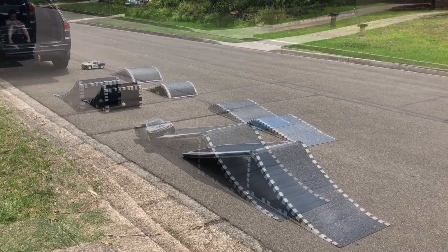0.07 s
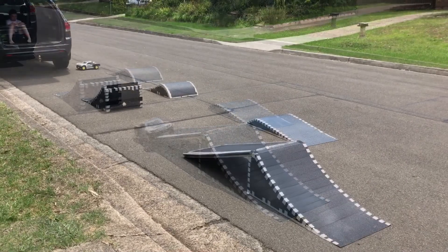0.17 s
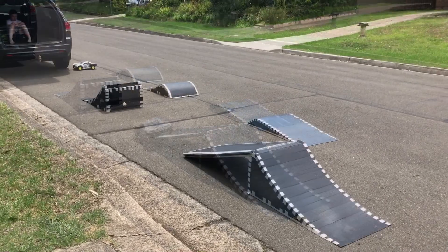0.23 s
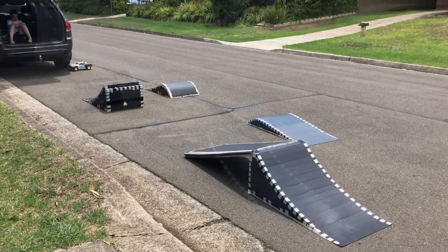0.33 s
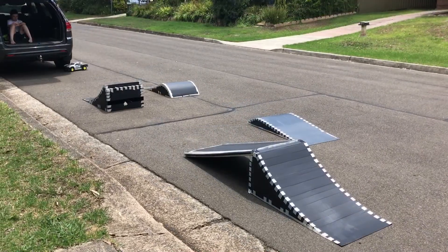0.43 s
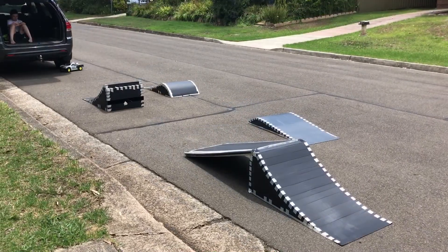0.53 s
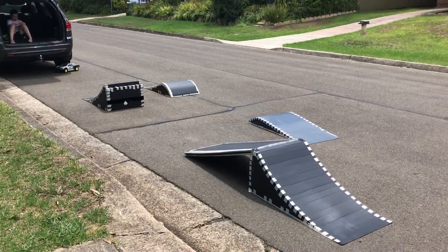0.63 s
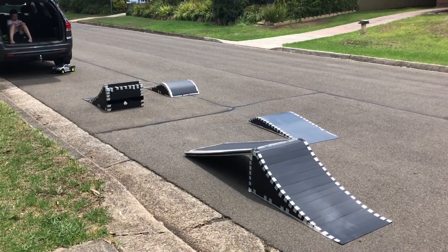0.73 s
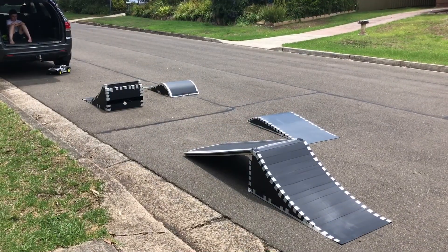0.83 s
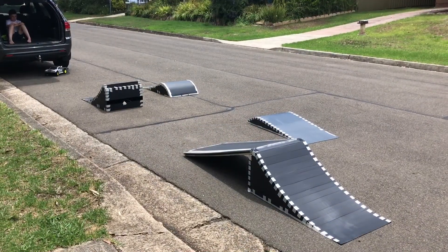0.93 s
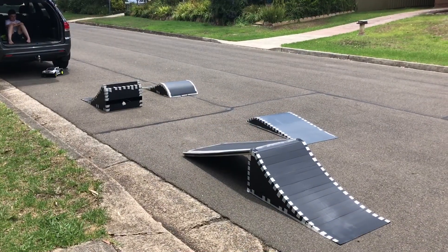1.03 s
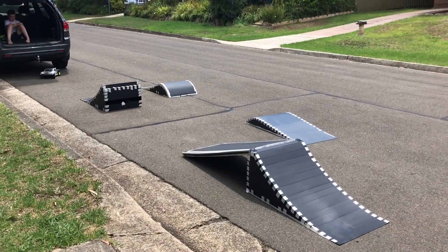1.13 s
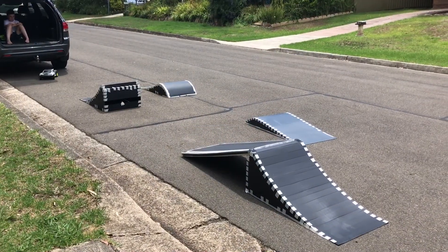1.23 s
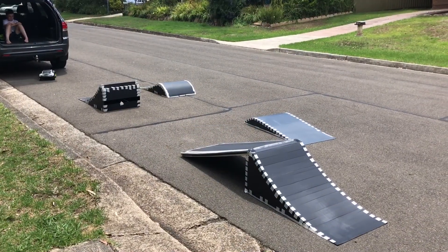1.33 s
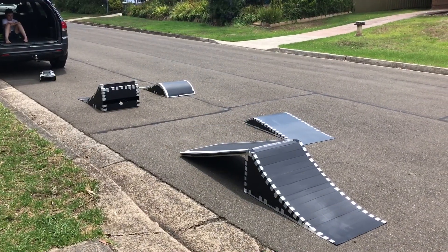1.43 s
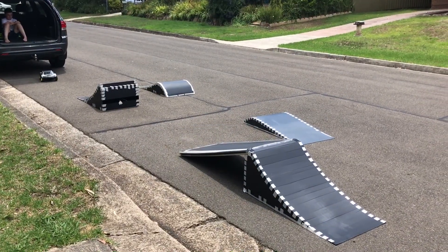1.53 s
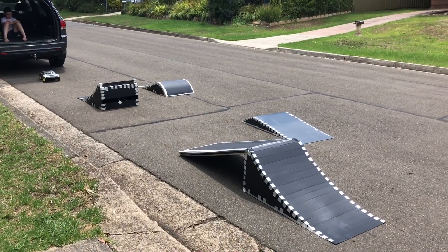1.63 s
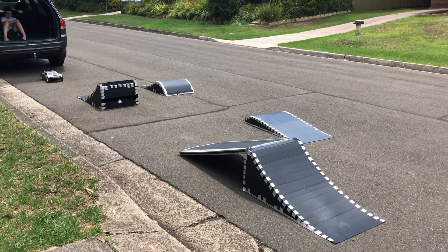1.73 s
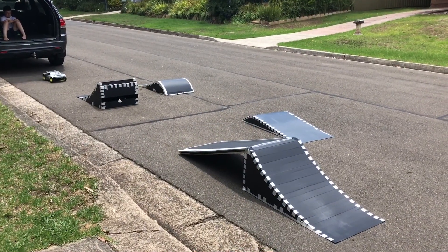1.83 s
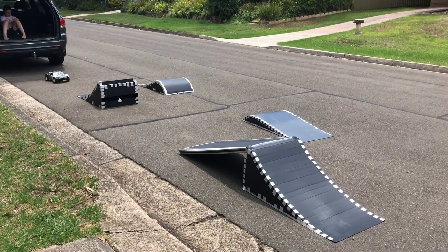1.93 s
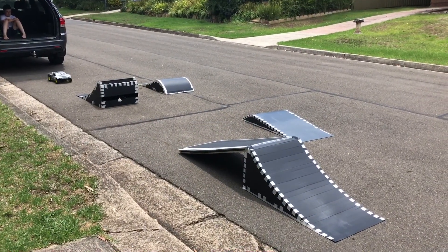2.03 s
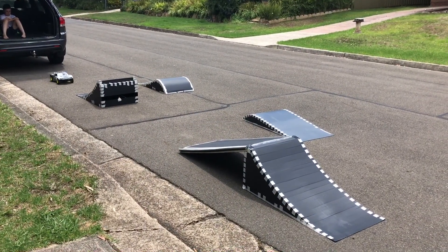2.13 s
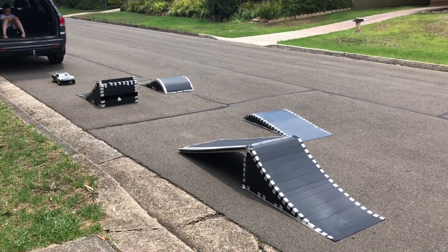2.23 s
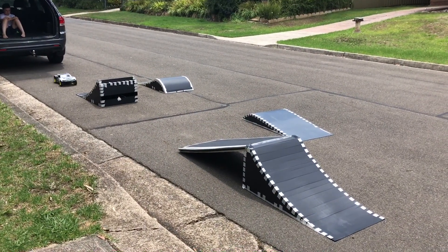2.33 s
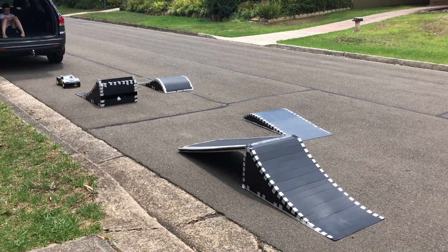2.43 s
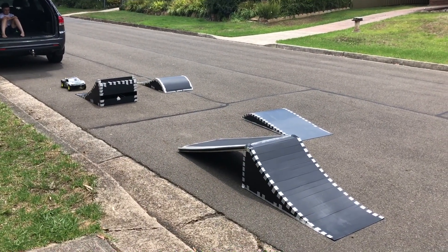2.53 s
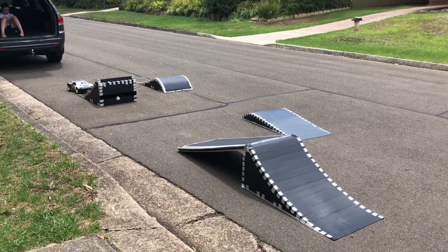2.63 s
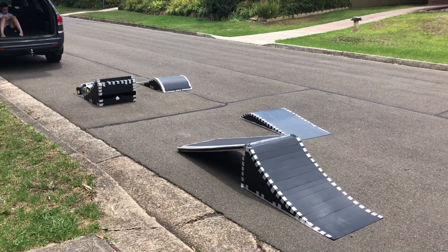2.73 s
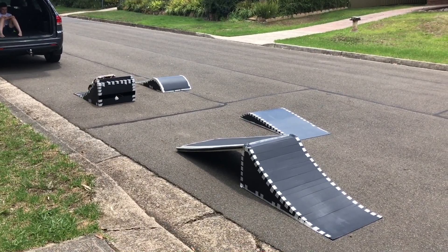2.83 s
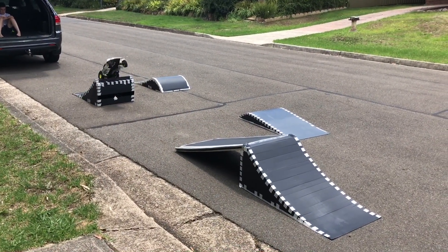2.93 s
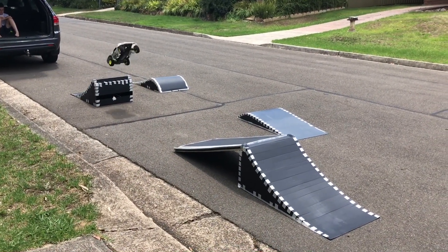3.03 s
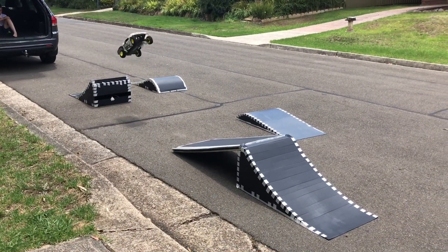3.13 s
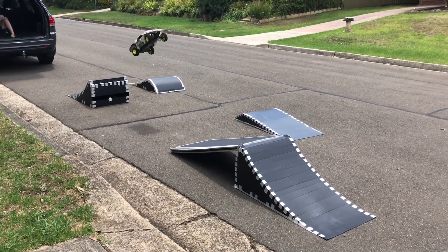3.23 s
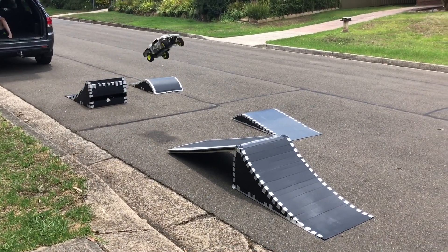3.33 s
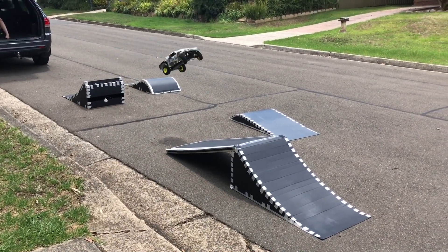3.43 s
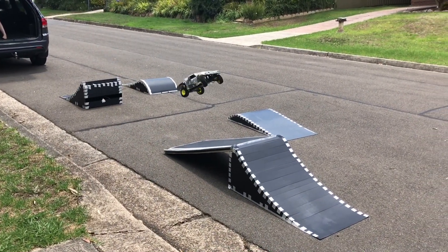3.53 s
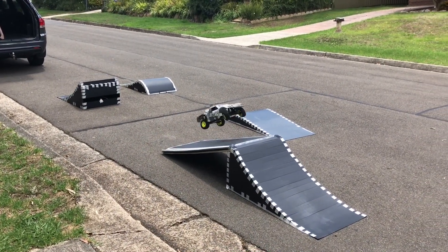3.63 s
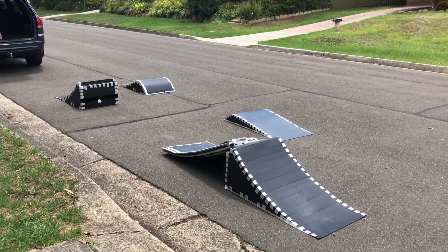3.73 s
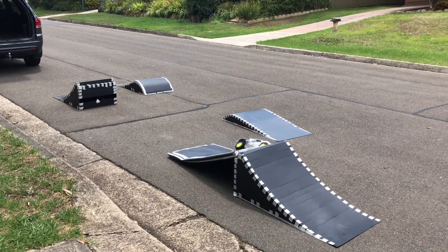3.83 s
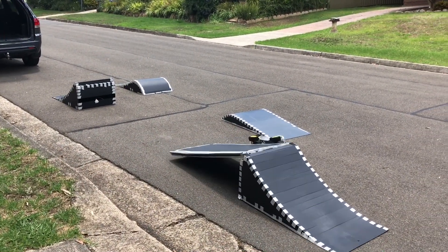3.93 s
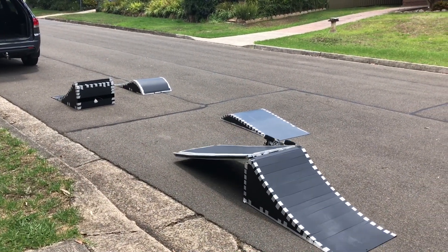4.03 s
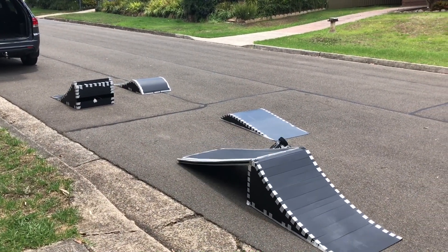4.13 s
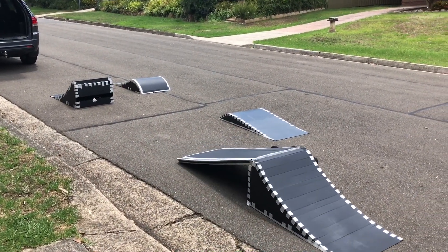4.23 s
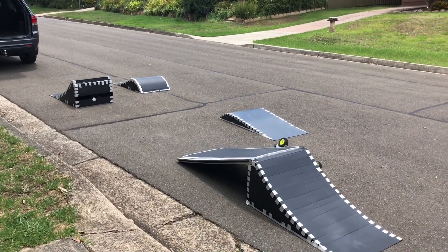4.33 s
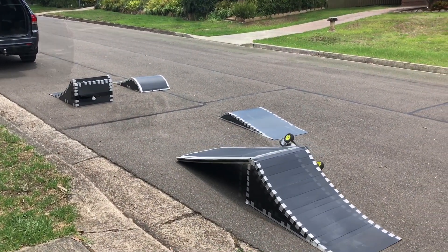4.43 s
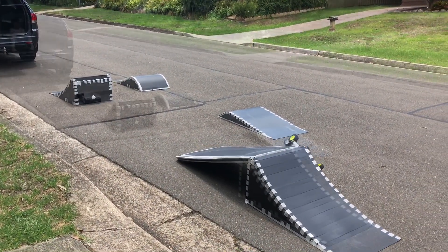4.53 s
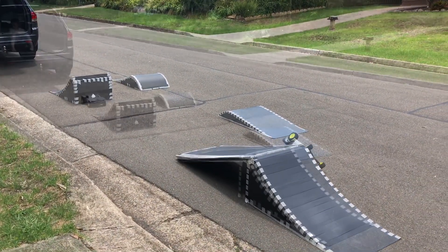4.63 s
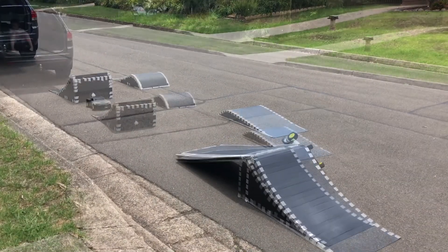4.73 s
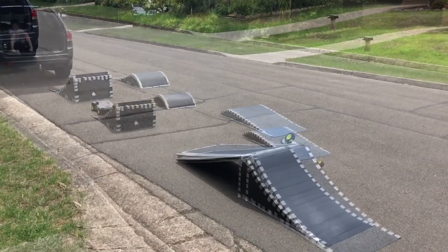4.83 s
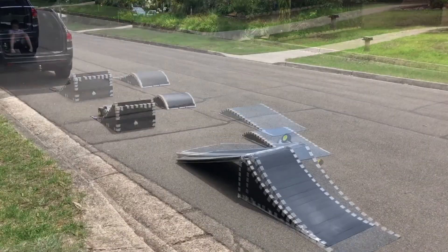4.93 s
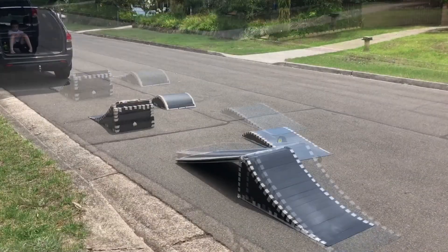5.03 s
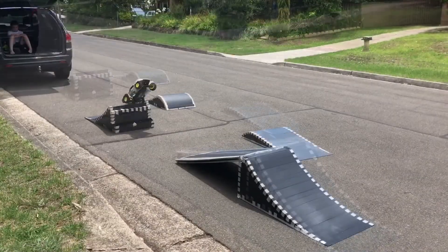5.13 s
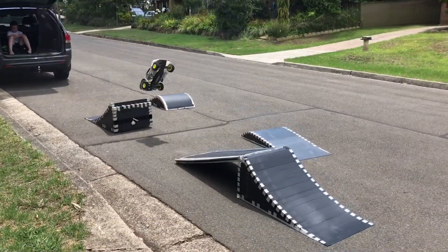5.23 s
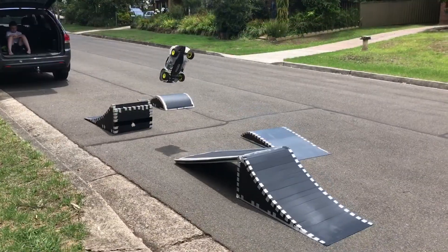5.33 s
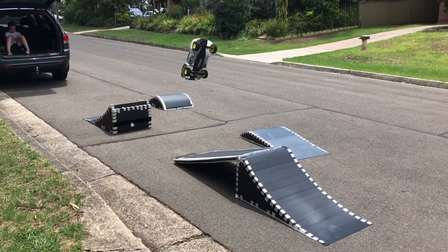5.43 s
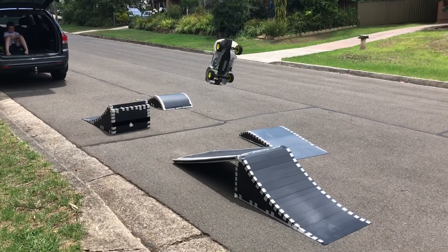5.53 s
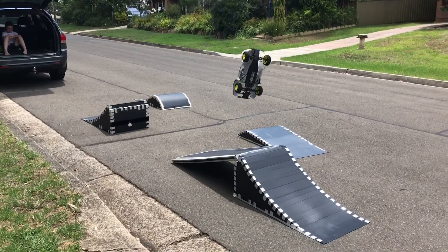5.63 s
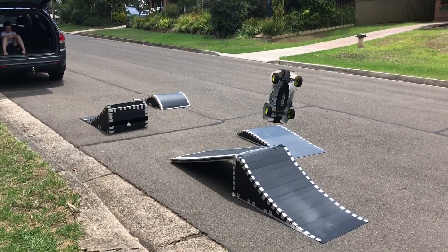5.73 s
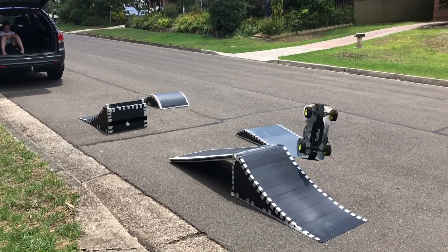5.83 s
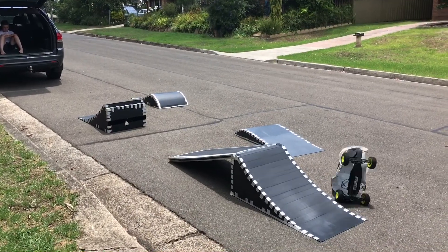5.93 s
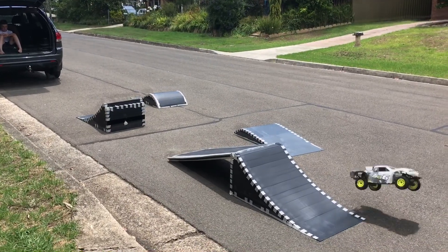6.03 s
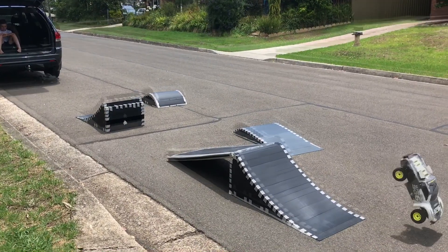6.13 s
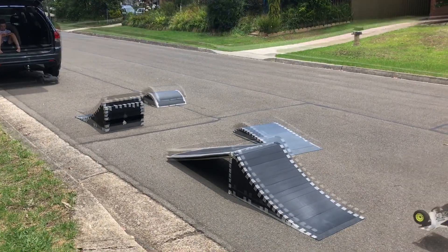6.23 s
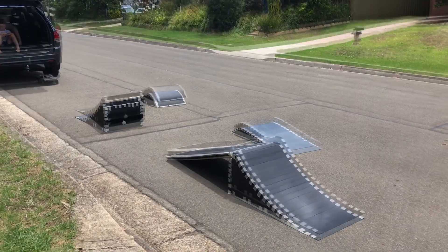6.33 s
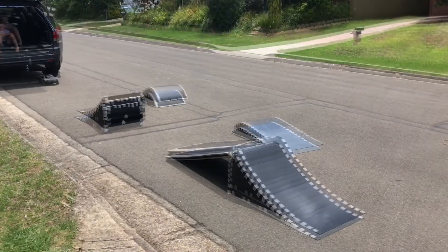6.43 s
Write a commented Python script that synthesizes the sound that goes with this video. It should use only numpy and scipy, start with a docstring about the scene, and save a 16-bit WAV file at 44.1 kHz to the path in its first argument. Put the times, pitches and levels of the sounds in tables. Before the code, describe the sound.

A quiet suburban street with faint traffic hum, thin bird whistles and insect buzzes. A small electric truck's gears whine up sharply, it jumps with a light rattle, then crashes onto hollow plastic ramps and tumbles in clattering knocks. After a brief lull it whirs again, takes off and slams much louder on the asphalt, bouncing once more. One outdoor microphone, mono, with faint street echoes.

```python
"""A small electric radio-controlled truck whines up to a ramp, jumps, crashes and tumbles on hollow plastic
ramps, jumps again and slams on the asphalt of a quiet suburban street; far traffic hums, birds whistle,
insects buzz. Random knocks ring the resonances of shell, ramp and gearbox; the gear whine is wavering sines
and narrow noise, birds are gliding sines, insects and traffic shaped noise. One microphone feeds both channels."""
import sys
import numpy as np
from scipy import signal
from scipy.io import wavfile
from scipy.ndimage import uniform_filter1d

SR = 44100
rng = np.random.default_rng(int(sys.argv[2]) if len(sys.argv) > 2 else 0)


def persist_wave(psi):
    """Save psi, clipped to +-1, as 16-bit WAV."""
    counts = np.round(np.clip(psi, -1, 1) * 32767).astype(np.int16)
    wavfile.write(sys.argv[1], SR, np.atleast_2d(counts).T)


N = 285327

# gearbox casing modes: f/Hz, width/Hz, relative level/dB
GEARBOX = [(818, 34, 10.5), (1264, 150, 2.5), (1620, 260, 2), (2083, 250, -0.5), (2730, 24, -4),
           (3086, 130, 0), (3580, 120, -34), (4360, 40, -15), (4700, 120, 0), (5240, 110, -3.5),
           (5500, 200, -3), (5980, 160, 0.5), (6250, 71, 0), (6700, 76, 2), (7360, 40, -6)]


def amp(db):
    """Decibels to gain."""
    return 10 ** (np.asarray(db) / 20)


def evened(x):
    """Scales to rms 1."""
    return x / np.sqrt(np.mean(x ** 2) + 1e-20)


def wander(s):
    """Random curve of rms 1 that changes over about s seconds."""
    span = round(s * SR)
    smooth = uniform_filter1d(rng.standard_normal(N), span)
    return evened(uniform_filter1d(smooth, span))


def grit(per_s, spread_db):
    """Random knocks of random sign and uneven size, rms 1."""
    size_db = spread_db * np.minimum(rng.exponential(1, N), 4)
    size = amp(size_db) * rng.choice([-1., 1.], N)
    return evened(size * (rng.random(N) < per_s / SR))


def read(points, hz):
    """Reads a spectrum on a log-frequency axis."""
    f, value = np.transpose(points)
    return np.interp(np.log(hz + 1), np.log(f + 1), value)


def resonate(x, hz, width):
    """Resonance of gain 1: shifts the curve hz down to zero, smooths, shifts back."""
    turn = np.exp(2j * np.pi * np.cumsum(hz * np.ones(len(x))) / SR)
    r = np.exp(-np.pi * width / SR)
    smooth = signal.lfilter([1 - r], [1, -r], x / turn)
    return 2 * (turn * smooth).real


def ringing(modes):
    """Click response of a body, energy 1: width sets the decay, a small body radiates no deep bass."""
    t = np.arange(4096) / SR
    ring = np.zeros(len(t))
    for hz, width, db in modes:
        ring += amp(db) * width * np.exp(-np.pi * width * t) * np.sin(2 * np.pi * hz * t)
    ring = signal.lfilter(*signal.butter(2, 1.33 * modes[0][0], "high", fs=SR), ring)
    return ring / np.linalg.norm(ring)


def causal(points):
    """Causal (minimum-phase) click with the given spectrum, energy 1."""
    hz = abs(np.fft.fftfreq(4096, 1 / SR))
    log_gain = np.log(amp(np.maximum(read(points, hz), -80)))
    click = np.fft.ifft(np.exp(np.conj(signal.hilbert(log_gain)))).real[:1024]
    return click / np.linalg.norm(click)


def levels(tables, column):
    """Gain over time from one column of curve tables, silent between them."""
    t, out = np.arange(N) / SR, np.zeros(N)
    for rows in tables:
        s, db = np.array(rows)[:, 0], np.array(rows)[:, column]
        fade = np.clip(np.minimum(t - s[0], s[-1] + 0.048 - t) / 0.012, 0, 1)
        out += amp(np.interp(t, s, db)) * fade
    return out


def swells(rows, scrape):
    """Scraping clicks ring one resonance, fixed or gliding, for a short swell."""
    out = np.zeros(N)
    for s, length, *ends_hz, width, db in rows:
        at, size = round(s * SR), round(length * SR)
        hz = np.linspace(ends_hz[0], ends_hz[-1], size)
        buzz = resonate(resonate(scrape[at:at + size], hz, width), hz, width)
        out[at:at + size] += amp(db) * evened(buzz) * np.sqrt(2 * np.hanning(size))
    return out


def echoes(x, t60_s):
    """Kerbs, ramps and house fronts return sparse, dull, dying taps."""
    taps = np.zeros(SR // 2)
    at = np.arange(400, len(taps) - 20, 20) + rng.integers(0, 20, (len(taps) - 401) // 20)
    taps[at] = rng.choice([-1., 1.], len(at)) * amp(-60 * at / SR / t60_s)
    taps = signal.lfilter([1], [1, -.6], taps)
    return signal.fftconvolve(x, taps / np.linalg.norm(taps))[:N]


def street():
    """Far traffic and leaves: random short-time spectra with drifting patches, plus a low drone and a hum."""
    # noise bed: f/Hz, relative density/dB per Hz
    bed_spectrum = [(15, -34), (25, 4), (70, 12.5), (114, -11.5), (185, 1), (439, -14), (988, -12.5),
                    (1520, -14.5), (2000, -20), (2760, -20), (4870, -25.5), (8590, -22.5), (10700, -32),
                    (12200, -32), (16000, -42)]
    # t/s, broad noise bed level/dB, its extra weight around 800 Hz/dB, low drone level/dB
    bed_levels = [(0, -50.5, -1.5, -53), (.4, -49, 3.5, -65), (.9, -48.5, 4, -48.5), (1.3, -50, 5, -42.5),
                  (1.9, -47.5, 8, -54.5), (2.5, -50.5, 4.5, -45), (3.6, -57.5, 14.5, -50.5),
                  (4.8, -45.5, -2.5, -55), (5.6, -47.5, -0.5, -43), (6.0, -49.5, 3.5, -43.5),
                  (6.47, -56.5, 13.5, -54)]
    # low drone: f/Hz, width/Hz, relative level/dB
    drone_modes = [(67, 21, -7.5), (111.3, 7.8, -13), (168.5, 7.3, -18)]
    # low hum that swells once: t/s, length/s, f/Hz, width/Hz, level/dB
    hum = [(5.2, 0.95, 186.2, 6.3, -59)]
    frames, hz = N // 256 + 5, np.fft.rfftfreq(1024, 1 / SR)
    a, b, patches = rng.standard_normal((frames, 513, 3)).T
    patches = evened(uniform_filter1d(uniform_filter1d(patches, 10, 0), 14, 1))
    s, level_db, mid_db, drone_db = np.transpose(bed_levels)
    mid_shape = np.exp(-(np.log((hz + 1) / 800) / 0.59) ** 2)
    mid = mid_shape[:, None] * np.interp(np.arange(frames) * 256 / SR, s, mid_db)
    spectra = (a + 1j * b) * amp(read(bed_spectrum, hz)[:, None] + 1.14 * patches + mid)
    bed = evened(signal.istft(spectra, nperseg=1024, noverlap=768)[1][:N])
    throb = rng.standard_normal(N)
    drone = sum(amp(db) * evened(resonate(resonate(throb, f, w), f, w)) for f, w, db in drone_modes)
    t = np.arange(N) / SR
    bed *= amp(np.interp(t, s, level_db))
    drone *= amp(np.interp(t, s, drone_db))
    return bed + drone + swells(hum, throb)


def insects():
    """High, broad buzzes from the verge, each bout at its own steady pace, and one fast trill."""
    # repeated buzz: first t/s, last t/s, period/s, length/s, f/Hz, width/Hz, level/dB
    bouts = [(0.2, .3, .678, .09, 10000, 2500, -65.5), (0.78, 2.3, .678, 0.051, 10400, 2800, -60),
             (0.25, 2.0, 0.767, 0.19, 7200, 3100, -61.5), (1.14, 2.45, 0.1766, 0.071, 12000, 1700, -68),
             (5.48, 6.4, .18, 0.084, 11600, 1500, -65)]
    # pulsing trill: t/s, length/s, f/Hz, width/Hz, level/dB
    trill = [(5.657, 0.39, 8700, 900, -69)]
    trill_per_s = 125
    rows = [(s, *buzz) for first, last, period, *buzz in bouts for s in np.arange(first, last, period)]
    scrape = grit(6000, 2.2)
    pulses = np.sin(np.pi * trill_per_s * np.arange(N) / SR) ** 4
    return swells(rows, scrape) + swells(trill, scrape * pulses)


def birds():
    """Short gliding, slightly unsteady whistles, some with an octave; fainter ones come from farther trees."""
    # whistles: t/s, length/s, start f/Hz, end f/Hz, level/dB
    whistles = [(.07, 0.069, 3090, 2830, -67), (0.134, 0.07, 2820, 2950, -65),
                (0.184, 0.037, 4240, 4300, -56), (0.23, 0.028, 3120, 3130, -58),
                (.246, 0.072, 2490, 2470, -67), (.33, 0.067, 2700, 2920, -60.5),
                (0.561, 0.071, 4830, 5280, -64), (0.802, 0.032, 2220, 2283, -57),
                (0.861, 0.071, 2450, 2610, -63), (1.442, 0.044, 2297, 2305, -60.5),
                (1.533, 0.077, 2475, 2920, -59.5), (1.643, 0.058, 2630, 2580, -61),
                (1.678, .04, 5170, 5500, -57), (2.054, 0.13, 4450, 4663, -66.5),
                (2.208, 0.063, 4480, 4900, -62), (4.617, 0.064, 3870, 4120, -58),
                (4.673, 0.063, 2760, 3070, -55.5), (4.799, .046, 4260, 4330, -56.5),
                (5.511, 0.11, 2580, 2820, -56), (5.57, 0.13, 5450, 5500, -58.5),
                (5.609, .036, 828, 890, -54), (5.663, 0.054, 1670, 1670, -55.5),
                (5.823, .036, 3480, 3000, -61), (5.844, 0.099, 2330, 2074, -63),
                (5.914, 0.042, 3500, 3340, -49.5), (5.959, 0.056, 2760, 2793, -53.5)]
    octave_db = -2.5
    out, draw = np.zeros(N), rng.random((40, 5))
    lowest, span = np.array([0, .05, 2300, .95, -79]), [6.3, .07, 2600, .12, 8]
    s, length, hz0, glide, db = (lowest + draw * span).T
    far = list(zip(s, length, hz0, hz0 * glide, db))
    warble = 1 + 0.0062 * wander(0.0056)
    tremble = evened(amp(2.8 * wander(0.0048)))
    for s, length, hz0, hz1, db in whistles + far:
        octave = amp(octave_db) * (2000 < hz0 < 2900)  # only whistles that start in this band, Hz
        at, u = round(s * SR), np.arange(round(length * SR)) / (length * SR)
        hz = (hz0 + (hz1 - hz0) * u) * warble[at:at + len(u)]
        turn = 2 * np.pi * np.cumsum(hz) / SR
        tone = np.sin(turn) + octave * np.sin(2 * turn)
        out[at:at + len(u)] += amp(db) * tone * np.sqrt(2 * np.sin(np.pi * u))
    return out * tremble


def gritty_tones():
    """Brief narrow, gritty ringing tones during the drive and jump: knocks ring gliding resonances."""
    # ringing tones: t/s, length/s, start f/Hz, end f/Hz, width/Hz, level/dB
    tones = [(2.39, 0.046, 2740, 2900, 119, -56), (2.96, .091, 1940, 1360, 151.2, -53),
             (3.19, 0.082, 1260, 1210, 60, -50.5), (3.34, .25, 1870, 1700, 70, -51),
             (3.4, 0.17, 4900, 4600, 200, -52.5), (3.42, 0.24, 6740, 6560, 100, -59),
             (3.6, 0.28, 4400, 3950, 160, -60), (5.0, 0.089, 4840, 4800, 120, -54),
             (5.09, .023, 840, 855, 100, -43.5), (5.07, 0.05, 4250, 4330, 100, -51),
             (5.24, 0.037, 4830, 5060, 500, -43), (5.39, 0.046, 1030, 1000, 100, -45.5)]
    return swells(tones, grit(900, 4))


def whine():
    """Gear teeth mesh at a wavering rate; worn teeth flutter and smear the tone, a second gear pair sings lower."""
    # one table a run-up, tooth mesh: t/s, f/Hz, level/dB
    run_ups = [
        [(2.41, 1190, -50), (2.474, 1704, -52), (2.508, 2260, -62), (2.522, 2800, -41), (2.546, 3174, -43.5),
         (2.7, 3154, -52), (2.774, 3153, -44), (2.86, 3140, -55), (3.012, 3180, -51), (3.055, 3600, -48),
         (3.078, 5900, -37.5), (3.134, 7320, -49), (3.24, 6900, -62)],
        [(4.66, 1648, -59), (4.826, 1869, -62), (4.885, 2300, -58), (4.905, 2740, -50), (4.925, 2800, -42),
         (4.95, 2920, -66)],
    ]
    second_db, second_db_per_khz = -81, 4  # grows with the pitch
    second_lag_s = 0.079  # the wheels' gear pair follows the motor late
    s, hz = np.vstack(run_ups)[:, :2].T
    hz = np.interp(np.arange(N) / SR, s, hz) * (1 + .011 * wander(.01))
    turn = 2 * np.pi * np.cumsum(hz * (1 + .012 * wander(.003))) / SR
    tone = np.sqrt(2) * np.sin(turn) * evened(amp(4 * wander(.006)))
    side = np.sqrt(2) * np.sin(.885 * turn) * evened(amp(5 * wander(.01)))  # one shaft turn below the mesh
    a, b, c = rng.standard_normal((3, N))
    spread = resonate(resonate(b, hz, 730), hz, 730)
    cased = evened(signal.oaconvolve(spread, ringing(GEARBOX))[:N])  # casing modes near the tone light up
    smear = evened(resonate(resonate(a, hz, 200), hz, 200))
    clean = np.clip(3400 / hz, 0, 1) ** 3  # at full revs the mesh loses its clean pitch
    lag = round(second_lag_s * SR)
    late_hz = 0.49 * uniform_filter1d(hz, round(2 * second_lag_s * SR), origin=lag - 1)
    second = evened(resonate(resonate(c, late_hz, 130), late_hz, 130))
    mesh = clean * (.9 * tone + .42 * side) + .75 * np.sqrt(clean) * smear
    mesh += (1 - clean) * evened(spread) + .5 * cased
    level = levels(run_ups, column=2)
    second_gain = (level > 0) * amp(second_db + second_db_per_khz * hz / 1e3)
    return level * mesh + second_gain * second


def jolts(column, rise_s, short=1, share=np.ones_like):
    """Gain over time of the rattle after each blow; share picks a part of its power by hardness."""
    # blows on the truck: t/s, shell level/dB, ramp boom level/dB, crack level/dB, rattle t60/s (before short)
    blows = [(0.781, -45.5, -69, -50.5, 0.19), (2.4, -45, -65, -44, 0.064), (2.978, -40, -49, -45, 0.11),
             (3.05, -48, -35, -54, 0.11), (3.072, -56, -44, -40.5, .06), (3.783, -25, -12, -24.5, 0.087),
             (3.848, -20.5, -21, -24, 0.083), (3.867, -35, -21, -25, .064), (3.885, -39, -42, -31, 0.09),
             (3.933, -33.5, -32.5, -30, 0.29), (4.082, -35, -48, -42, 0.36), (4.109, -44, -22, -36, 0.067),
             (4.119, -48, -31, -35.5, 0.079), (4.186, -28, -36, -33.5, 0.14), (4.203, -18, -45, -60, 0.089),
             (4.266, -25, -50, -32.5, 0.072), (4.363, -28.5, -45, -44.5, 0.15),
             (4.382, -23.5, -48, -47, 0.069), (4.448, -47, -38, -46.5, 0.3), (4.509, -52, -53, -46, 0.096),
             (4.58, -46, -43, -46, 0.22), (4.612, -39.5, -30, -49, 0.14), (5.031, -42, -57, -49, 0.078),
             (5.084, -32.5, -48, -42, 0.12), (5.146, -40, -47, -60, 0.067), (5.252, -31, -26, -46, .05),
             (5.298, -45, -39.5, -48, 0.19), (5.417, -58, -58, -40, .065), (5.455, -47, -40, -50, 0.07),
             (6.031, -6, -8, -13, .13), (6.044, -10, -18, -13, 0.029), (6.059, -27, -32, -13, 0.059),
             (6.088, -16, -35, -14, 0.031), (6.125, -36, -10, -18, 0.058), (6.159, -27.5, -31, -32, 0.069),
             (6.172, -26, -21, -32, 0.05), (6.233, -74, -70, -46, 0.19), (6.287, -50, -75, -53, 0.24),
             (6.345, -52, -69, -48, 0.31), (6.438, -15.5, -16, -23, 0.13), (6.455, -18.5, -45, -21.5, 0.33)]
    soft_db, hard_db = -42, -10.5  # crack minus shell level of a fully soft and a fully hard contact
    power, t = np.zeros(N), np.arange(SR // 2) / SR
    for row in blows:
        part = power[round(row[0] * SR):][:len(t)]  # a view: adds into power
        decay = amp(row[column] - 60 * t / max(short * row[4], .005))
        shape = (1 - np.exp(-t / rise_s)) * decay
        hardness = np.clip((row[3] - row[1] - soft_db) / (hard_db - soft_db), 0, 1)
        part += share(hardness) * shape[:len(part)] ** 2
    return np.sqrt(power)


def truck():
    """Rolling grit and blows shake the shell, the hollow ramp, the gearbox and the small hard parts."""
    # one table a stretch (drive, slide, drive, slide):
    # t/s, shell rattle level/dB, ramp rumble level/dB, gear and tyre hiss level/dB
    roll = [
        [(2.38, -62, -68, -64), (2.49, -49.5, -62, -52.5), (2.53, -42, -66, -47), (2.67, -42, -53, -49),
         (2.74, -49, -52.5, -50.5), (2.9, -42.5, -48.5, -53.5), (2.96, -52, -48, -58), (3.0, -46, -52, -48.5),
         (3.07, -45, -46.5, -48.5), (3.2, -49, -60, -45), (3.77, -53.5, -66, -49)],
        [(3.79, -36, -33, -41), (3.86, -26.5, -20, -33.5), (4.05, -46, -55, -45), (4.175, -49.5, -41, -47),
         (4.2, -33.5, -28, -40.5), (4.29, -38, -39.5, -48.5), (4.32, -40, -41.5, -53.5),
         (4.41, -45.5, -45.5, -59), (4.62, -42, -47, -53.5), (4.7, -58, -56, -58.5)],
        [(4.86, -61.5, -71, -56), (5.01, -41.5, -56, -51), (5.17, -44, -42, -47), (5.27, -43, -32, -43.5),
         (5.35, -50, -73, -45.5), (5.45, -46.5, -49, -49.5), (5.54, -62, -58, -66)],
        [(6.04, -4.5, -37, -16), (6.1, -18.5, -39, -35.5), (6.216, -49, -46.5, -50.5), (6.41, -56, -66, -59)],
    ]
    # body shell and chassis: f/Hz, width/Hz, relative level/dB
    shell_modes = [(370, 37, 27.5), (637, 25, -12), (703, 210, 19), (885, 71, 11), (990, 400, 20),
                   (1162, 55, 5), (1500, 50, -25), (1432, 490, 19), (1700, 96, 9), (2400, 21, -11)]
    # hollow plastic ramp: f/Hz, width/Hz, relative level/dB
    ramp_modes = [(61.3, 40, 16), (112, 410, 7.5), (237, 162, 18), (325, 15, -25)]
    # small hard parts: f/Hz, relative density/dB per Hz
    crack_spectrum = [(1180, -34), (2000, -1), (2810, -8), (3680, 1), (4940, -8), (6880, -11),
                      (7570, -16.5), (9250, -14), (10300, -22.5), (12900, -16), (16000, -25)]
    # gears and tyres: f/Hz, relative density/dB per Hz
    hiss_spectrum = [(1200, -16.5), (2400, 2), (3100, -1), (4200, 5.5), (5000, -1.5), (6500, 0), (7600, -5),
                     (8600, -1.5), (10400, -8.5), (12300, -5.5), (16000, -12.5)]
    # gearbox chatter over the tyre hiss: t/s, level/dB
    chatter_over_hiss = [(2.6, -10), (2.95, 1), (3.1, 3.5), (3.77, 0.5), (5.0, -6.5), (5.5, 1.5)]
    tick_db, tick_share = 1, 0.09  # first sharp tick over the crack, its share of the rattle time
    lumps = evened(amp(2.5 * wander(.003)))  # loose knocks
    bumps = evened(amp(1.5 * wander(.012)))  # uneven road
    rattle, bright = lumps * grit(1200, 3.4), ringing(shell_modes)
    # a soft, flat contact drums the big panels
    dull = signal.lfilter(*signal.butter(2, [550, 1000], "band", fs=SR), bright)
    dull /= np.linalg.norm(dull)
    hard = levels(roll, column=1) * bumps * grit(3000, 0.88)
    hard += jolts(column=1, rise_s=0.0009, share=lambda h: h) * rattle
    soft = jolts(column=1, rise_s=0.0079, share=lambda h: 1 - h) * rattle
    ramp = levels(roll, column=2) + jolts(column=2, rise_s=0.024)
    ramp *= grit(1500, 2.2)
    hiss = levels(roll, column=3) * grit(15000, 5.0)
    revs = amp(np.interp(np.arange(N) / SR, *np.transpose(chatter_over_hiss)))
    chatter = revs * levels(roll[::2], column=3) * bumps * grit(2500, 2.2)  # only while the motor drives
    crack = jolts(column=3, rise_s=.0003, short=0.94) * lumps * grit(10000, 1.5)
    crack += amp(tick_db) * jolts(column=3, rise_s=.0001, short=tick_share) * grit(20000, 1.5)
    parts = [(hard, bright), (soft, dull), (ramp, ringing(ramp_modes)), (hiss, causal(hiss_spectrum)),
             (chatter, ringing(GEARBOX)), (crack, causal(crack_spectrum))]
    return sum(signal.oaconvolve(x, body)[:N] for x, body in parts)


def scene():
    """All sources and their echoes at one microphone."""
    near = truck() + whine() + gritty_tones()
    far = birds()
    far += amp(-8) * echoes(far, t60_s=.35)
    mono = near + amp(-20.5) * echoes(near, t60_s=0.44) + far + insects() + street()
    return np.array([mono, mono])


def record(dry):
    """The microphone drops deep bass, the preamp rounds the highest peaks; then the band limit."""
    edge_hz = 15800
    thin = signal.sosfilt(signal.butter(4, 45, "high", fs=SR, output="sos"), dry)
    rounded = 1.2 * np.tanh(thin / 1.2)
    lowpass = signal.firwin(511, edge_hz, window=("kaiser", 9), fs=SR)
    return signal.oaconvolve(rounded, lowpass[None], "same")


dry = scene()
out = record(dry)
persist_wave(out)
```